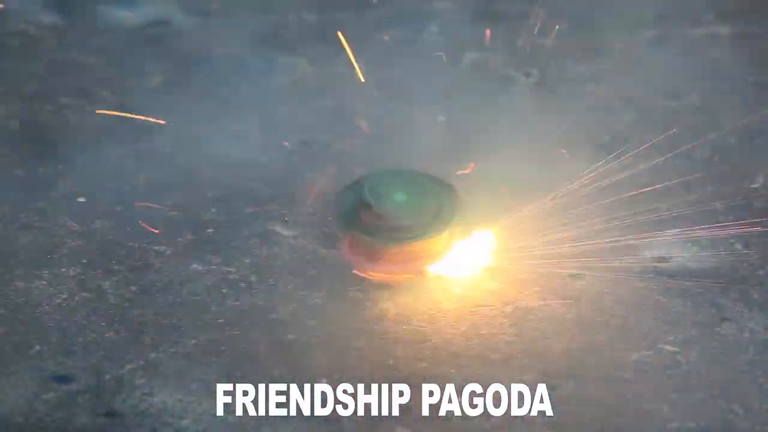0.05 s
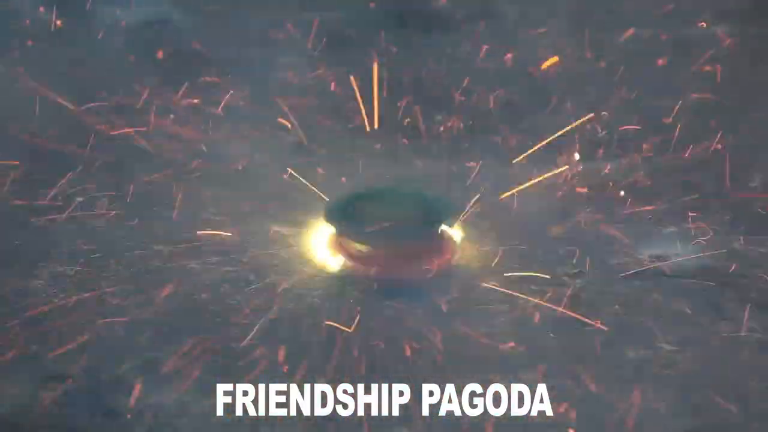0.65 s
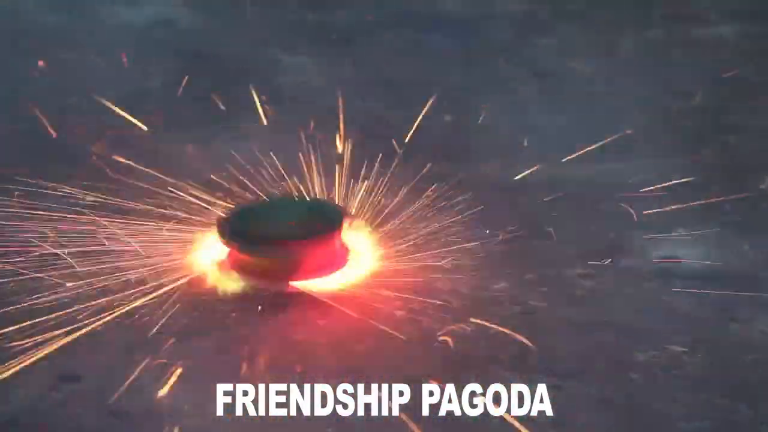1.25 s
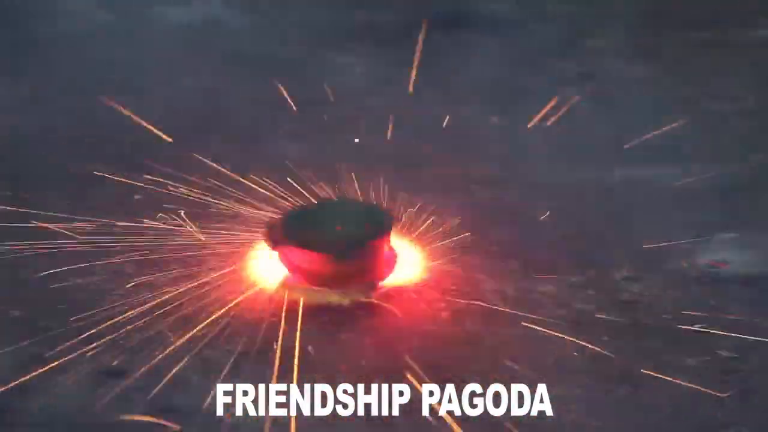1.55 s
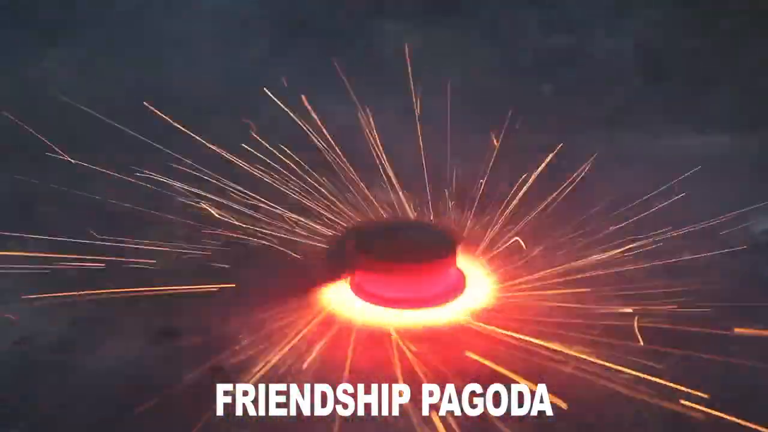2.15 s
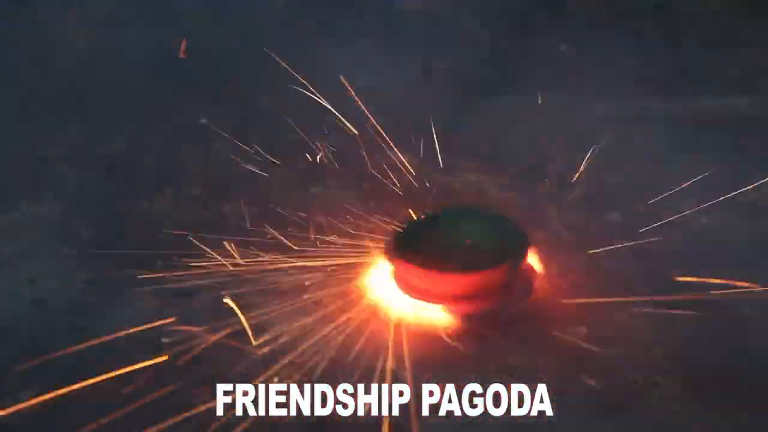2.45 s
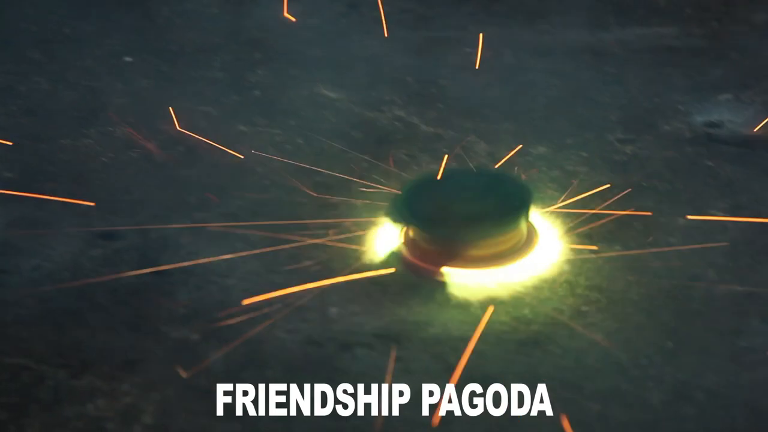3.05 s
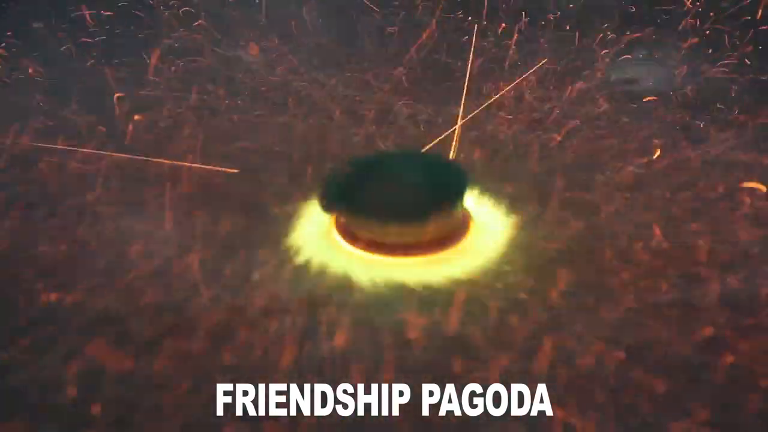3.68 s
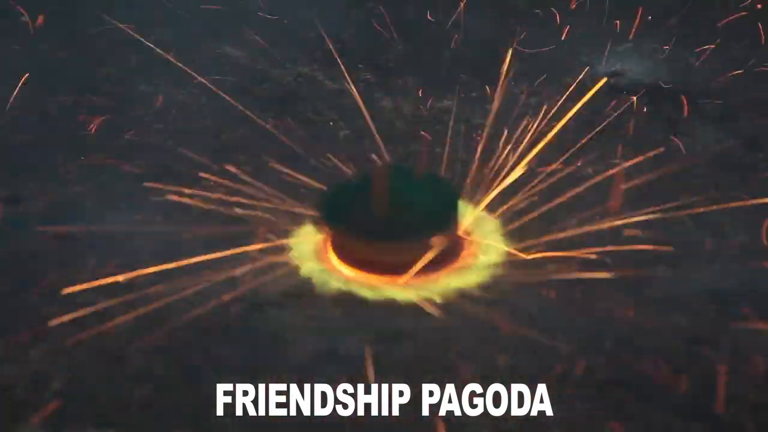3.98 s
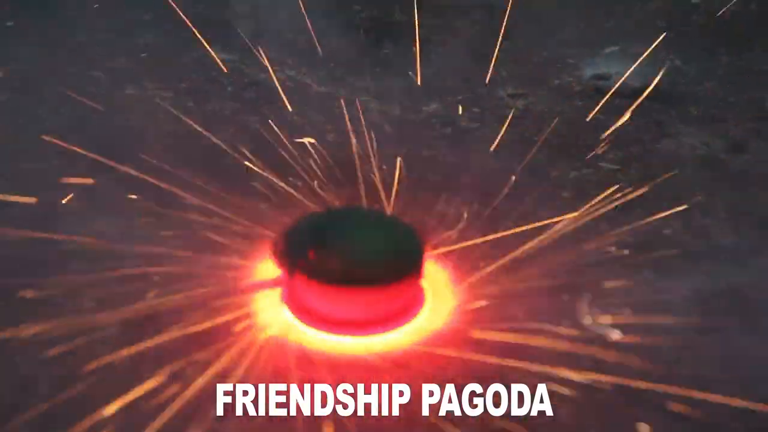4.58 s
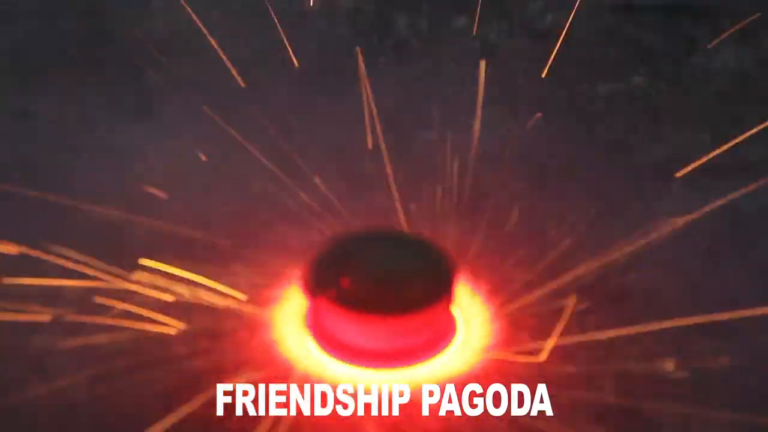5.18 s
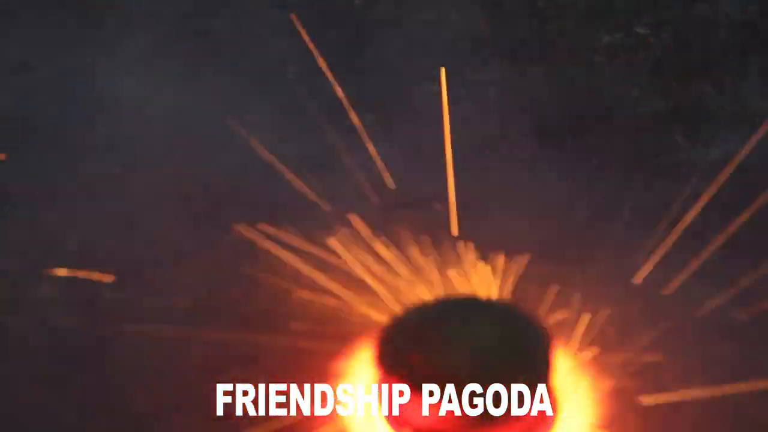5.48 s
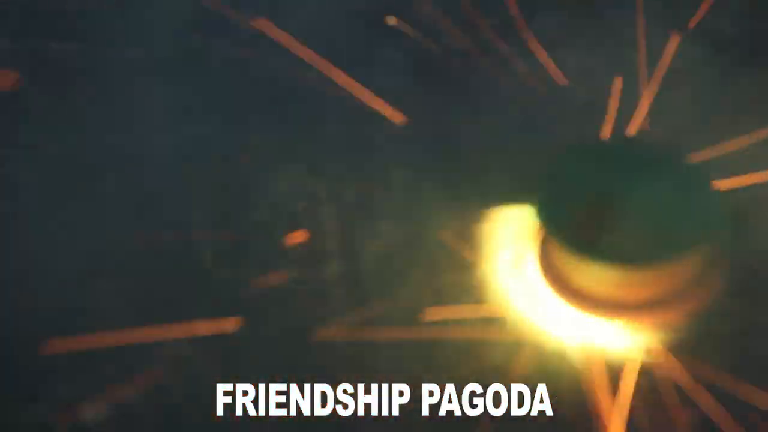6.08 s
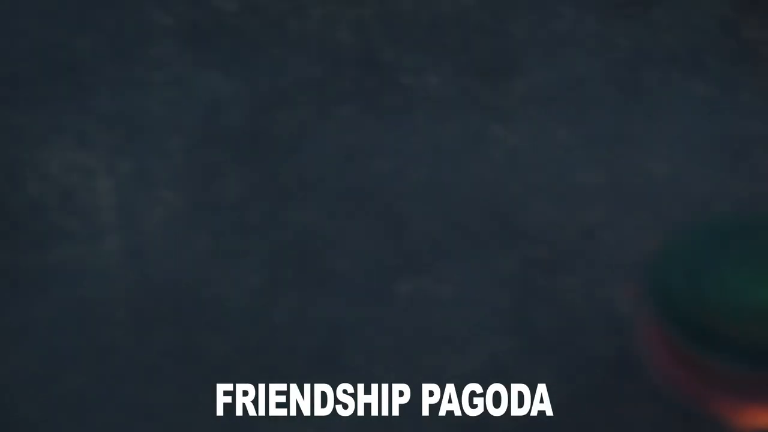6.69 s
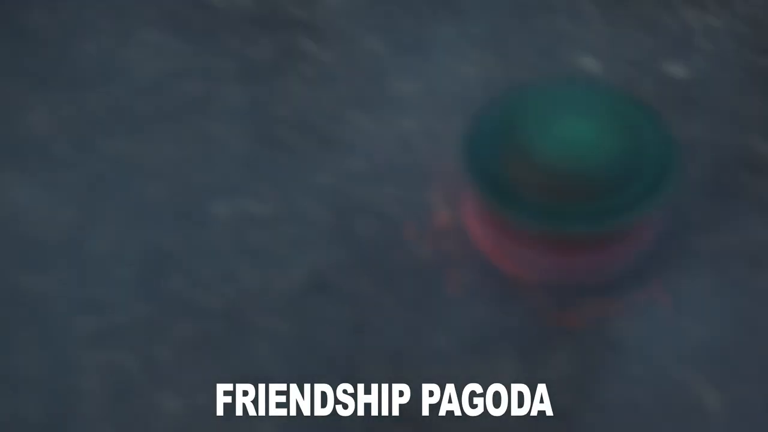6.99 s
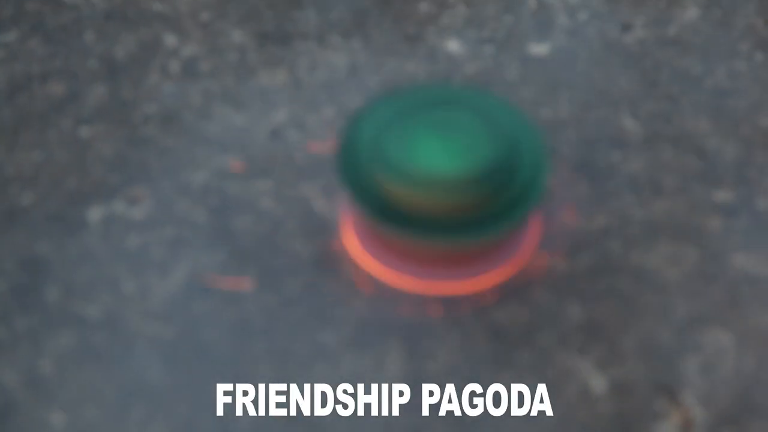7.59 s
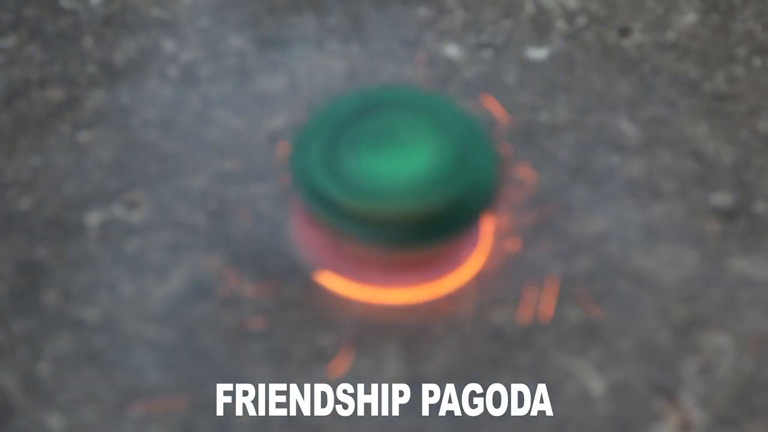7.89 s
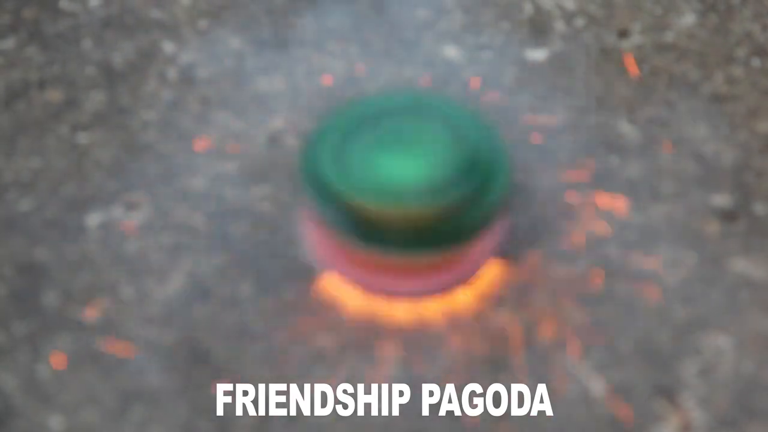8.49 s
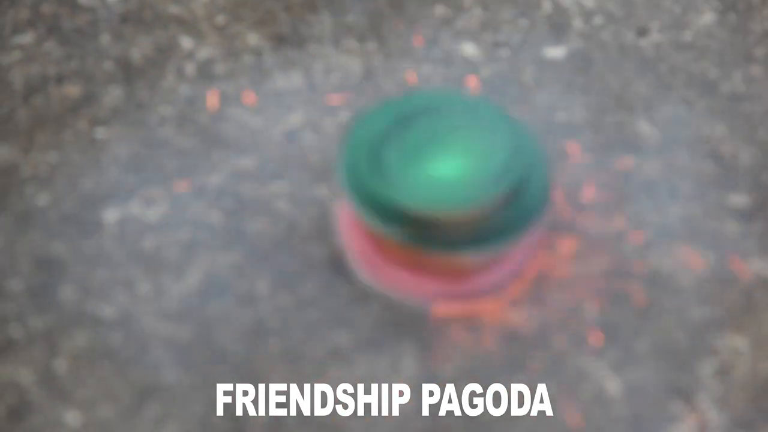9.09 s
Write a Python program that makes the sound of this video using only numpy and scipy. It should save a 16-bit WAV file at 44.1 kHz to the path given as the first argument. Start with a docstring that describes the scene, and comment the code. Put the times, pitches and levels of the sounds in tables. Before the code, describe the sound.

Outdoors and close up, a firework sputters into a loud, whirring hiss as it spins on the pavement, throwing off sharp snaps of sparks. It flares a second time, dips and builds again, then dies about two thirds of the way through. What remains is much quieter: a smouldering hiss, light ticks of the wobbling casing, soft low bumps, and finally a rising fizz of embers with a low rumble.

```python
"""A small ground firework spins up on pavement, close by, over a faint outdoor background.
Its jet of gas and burning grains hisses, sparks snap, and the nozzle's beam sweeps past once a turn.
At 3.55 s a second charge flares and burns on; near 6.3 s the flame gutters and dies.
The casing coasts, smouldering and ticking on the ground, with a few soft low bumps.
Near the end the embers catch again and fizz, and a low rumble swells."""
import sys
import numpy as np
from scipy import signal
from scipy.fft import rfft, irfft, next_fast_len
from scipy.io import wavfile

SR = 44100
rng = np.random.default_rng(int(sys.argv[2]) if len(sys.argv) > 2 else 0)


def int16_out(signal):
    """Quantize to a 16-bit WAV file."""
    q = np.round(np.clip(np.atleast_2d(signal).T, -1, 1) * 32767)
    wavfile.write(sys.argv[1], SR, q.astype(np.int16))


N = 411894
TIME = np.arange(N) / SR
FREQ_HZ = np.arange(N // 2 + 1) * SR / N + 1e-3
TOP_HZ = 15750
SECOND_LIT_S, BURNOUT_S = 3.55, 6.285


def undb(db):
    """Decibels to gain."""
    return 10 ** (np.asarray(db) / 20)


def unit(x):
    """Scale to rms 1."""
    return x / np.sqrt(np.mean(x ** 2))


def over_pitch(hz, points_hz, values):
    """Interpolate on a log-frequency axis."""
    return np.interp(np.log(hz), np.log(points_hz), values)


def band(x, hz, ratio, order=2):
    """Band-pass from hz / ratio to hz * ratio."""
    edges_hz = [hz / ratio, min(hz * ratio, SR * .45)]
    return signal.sosfilt(signal.butter(order, edges_hz, 'bandpass', fs=SR, output='sos'), x)


def walk(rate_hz, t):
    """Smooth random curve, spread near 1."""
    knots_s = np.arange(0, t[-1] + 2 / rate_hz, 1 / rate_hz)
    return np.interp(t, knots_s, rng.standard_normal(len(knots_s))) * np.sqrt(3 / 2)


def ramp(t, start_s, length_s):
    """Linear rise from 0 to 1."""
    return np.clip((t - start_s) / length_s, 0, 1)


def gate(t, start_s, length_s, edge_s):
    """Attack, hold, release."""
    return ramp(t, start_s - edge_s / 2, edge_s) - ramp(t, start_s + length_s - edge_s / 2, edge_s)


def air(level_db=-56):
    """Soft, dull outdoor background."""
    # noise spectrum (frequency [Hz], relative density [dB])
    spectrum = [(25, -34), (55, -2.5), (120, -1), (300, -6), (1000, -15), (4000, -10.5), (15000, -29)]
    gain = undb(over_pitch(FREQ_HZ, *np.transpose(spectrum)))
    return undb(level_db) * unit(irfft(rfft(rng.standard_normal(N)) * gain, N))


def rumble(hz=48, waver=0.065, throb_db=2, noise_db=-8):
    """Wavering low drone with noise around it."""
    # rumble swells (start [s], length [s], level [dB])
    swells = [(6.4, 2.5, -70), (7.25, .6, -66), (8.756, .37, -45), (9.23, .15, -45)]
    pitch_hz = hz * (1 + waver * walk(20, TIME))
    tone = np.sin(2 * np.pi * np.cumsum(pitch_hz) / SR) * undb(throb_db * walk(14, TIME))
    noise = unit(band(rng.standard_normal(N), hz=60, ratio=1.5))
    envelope = sum(undb(db) * gate(TIME, s, length_s, edge_s=.06) for s, length_s, db in swells)
    return (unit(tone) + undb(noise_db) * noise) * envelope


def bumps(rise_s=0.0055):
    """Soft pushes, each on one damped low mode."""
    # low bumps (time [s], level [dB], pitch [Hz], t60 [s])
    pushes = [(7.340, -39, 110, 0.39), (7.434, -25, 101.5, 0.23), (9.213, -33, 99, .17)]
    out = np.zeros(N)
    for s, db, hz, t60_s in pushes:
        t = np.maximum(TIME - s, 0)
        envelope = (1 - np.exp(-t / rise_s)) * np.exp(-np.log(1000) * t / t60_s)
        out += undb(db) * envelope * np.sin(2 * np.pi * hz * t)
    return out


def bursts(table, ratio, tail_db, tail_s):
    """Short noise bursts, each with a faint tail scattered from the ground."""
    out, t = np.zeros(N + SR), TIME[:SR // 3]
    for s, db, length_s, hz in table:
        body = np.sqrt(t / length_s) * np.exp(-(t / length_s) ** 2)
        tail = undb(tail_db) * np.exp(-t / tail_s)
        burst = band((body + tail) * rng.standard_normal(len(t)), hz, ratio)
        start = int(s * SR)
        out[start:start + len(t)] += undb(db) * burst / np.sqrt(np.sum(burst ** 2) / (length_s * SR))
    return out[:N]


def puffs():
    """Dull puffs of the flame."""
    # puffs (time [s], level [dB], length [s], centre [Hz])
    thumps = [(1.036, -27.5, 0.0053, 450), (1.206, -27.5, 0.006, 300), (1.240, -33, .006, 350),
              (4.383, -26.5, 0.0032, 500), (4.396, -27, 0.008, 288), (6.228, -27.5, 0.0085, 230),
              (6.807, -42, 0.0053, 750), (6.961, -41.5, 0.0048, 500), (9.092, -32, .003, 450)]
    return bursts(thumps, ratio=2.3, tail_db=-21, tail_s=0.022)


def casing_ticks(direct_db=-6):
    """The wobbling casing touches the pavement and rings briefly."""
    # ground contacts (time [s], level [dB], length [s], centre [Hz])
    touches = [(6.553, -35, .003, 4000), (6.585, -17.5, 0.0011, 2020), (6.627, -35, 0.0025, 2800),
               (6.658, -33, 0.0034, 3600), (6.662, -27, 0.0036, 2480), (6.706, -38, 0.0039, 2500),
               (6.785, -40, 0.0097, 3440), (6.875, -38, 0.0028, 1790), (6.962, -46, 0.0066, 1500),
               (7.139, -39.5, .004, 1700), (7.207, -35, 0.0065, 2800), (7.310, -36, 0.0045, 2800),
               (7.562, -29, 0.0058, 3420), (7.675, -32.5, 0.0048, 2850), (8.3445, -20.5, 0.0031, 2100),
               (9.3285, -16, 0.0023, 2950)]
    # casing resonances (frequency [Hz], gain [dB])
    modes = [(1500, -1), (2550, -5), (3950, -5), (6300, -10.5)]
    contact = bursts(touches, ratio=1.78, tail_db=-23, tail_s=0.0096)
    ring = sum(undb(db) * band(contact, hz, ratio=1.154, order=1) for hz, db in modes)
    return undb(direct_db) * contact + ring


def snaps(hz=2900, ratio=2.7):
    """Each bursting spark is one pressure spike."""
    # bursting sparks (time [s], peak [dB])
    sparks = [(.090, -4), (.103, -6), (.3545, 3), (.498, -13), (.886, -9), (1.223, -5), (1.302, -12),
              (1.448, -12), (1.529, -6.5), (1.697, -10), (1.872, -7), (2.124, -9), (2.350, -9), (2.708, -8),
              (2.776, -10), (3.268, -12), (3.375, -10), (3.601, -9), (4.707, -11), (5.131, -10),
              (5.585, -11)]
    spikes = np.zeros(N)
    for s, db in sparks:
        spikes[int(s * SR)] += undb(db)
    peak = abs(band(signal.unit_impulse(SR // 10), hz, ratio)).max()
    return band(spikes, hz, ratio) / peak


def stages(t):
    """Shares of the three stages: first charge, second charge, embers."""
    lit, spent = ramp(t, SECOND_LIT_S, length_s=0.13), ramp(t, BURNOUT_S, length_s=0.2)
    return np.array([1 - lit, lit - spent, spent])


def strength_db(t):
    """Steady jet level: a charge starts weak, then burns through."""
    # jet strength in each stage (time [s], level [dB])
    first = [(.57, -33), (.82, -31), (1.06, -22), (1.35, -23.5), (1.55, -22), (2.2, -23), (2.7, -26),
             (3.3, -25), (3.53, -25)]
    second = [(3.74, -30), (4.17, -32.5), (4.35, -27), (4.53, -24), (4.95, -25), (5.45, -24.5), (5.8, -24),
              (6.05, -22), (6.28, -23)]
    embers = [(6.55, -48), (6.95, -49.5), (7.3, -48), (7.55, -44), (7.78, -45), (8.2, -36), (8.6, -37),
              (9.3, -38.5)]
    levels_db = [np.interp(t, *np.transpose(table)) for table in (first, second, embers)]
    return np.sum(stages(t) * levels_db, axis=0)


def burn(t, full_db=-22.5, roar_lag_s=.12):
    """Low roar [dB], sizzle [dB], beam focus. A weak charge roars lower and beams less tightly."""
    # extra roar and extra sizzle (first charge [dB], second charge [dB], embers [dB])
    stage_roar_db = [-.5, -2.5, 2.5]
    stage_sizzle_db = [.5, 1.27, 4.5]
    shares = stages(t)
    burning = 1 - shares[2]
    # the second charge chokes and gutters; the embers catch with a dull rush, then fizz
    choke = burning * ramp(t, 5.9, BURNOUT_S - 5.9) ** 2
    gutter = gate(t, start_s=6.245, length_s=.22, edge_s=.05)
    catch = ramp(t, start_s=7.8, length_s=0.39)
    fizz = ramp(t, start_s=8.3, length_s=0.71)
    shortfall_db = burning * (full_db - strength_db(t - roar_lag_s))
    roar_db = np.dot(stage_roar_db, shares) + 5 * choke + 0.96 * shortfall_db
    sizzle_db = np.dot(stage_sizzle_db, shares) - 3.5 * choke - 6.5 * gutter - 4 * catch + 9 * fizz
    focus = 1.15 - .06 * burning * np.maximum(full_db - strength_db(t), 0)
    return roar_db, sizzle_db, focus * (1 - .6 * gutter)


def crackle(per_s=2200, spread_db=4.2, limit_db=19):
    """Tiny bursts of burning grains: many weak, a few strong."""
    size = undb(np.minimum(spread_db * rng.exponential(size=N), limit_db))
    return unit((rng.random(N) < per_s / SR) * size * rng.choice([-1, 1], N))


def bore(x, lower_hz=4100, upper_hz=6400, fresh_db=3.5, fade_db_per_s=2.5):
    """Two nozzle resonances: the lower grows with sizzle, the upper fades as the second charge burns."""
    # lower resonance boost (first charge [dB], second charge [dB], embers [dB])
    stage_db = [0.4, -0.7, 0.5]
    # near-whistles (start [s], length [s], boost [dB])
    swells = [(.17, .06, 4.5), (4.4, 0.38, 2), (8.75, .55, 1)]
    _, sizzle_db, _ = burn(TIME)
    shares = stages(TIME)
    swells_db = sum(db * gate(TIME, s, length_s, edge_s=0.046) for s, length_s, db in swells)
    lower_db = np.dot(stage_db, shares) + 0.62 * sizzle_db + swells_db
    upper_db = shares[1] * (fresh_db - fade_db_per_s * (TIME - SECOND_LIT_S))
    lower = (undb(lower_db) - 1) * band(x, lower_hz, ratio=1.11, order=1)
    upper = (undb(upper_db) - 1) * band(x, upper_hz, ratio=1.12, order=1)
    return x + lower + upper


def beam_sweep_db(hz, facing, beam):
    """Level swing at hz as the nozzle turns: a main lobe and a weak one behind."""
    beam_hz, once_db, direction_turns, twice_db = np.transpose(beam)
    lobe_db = over_pitch(hz, beam_hz, once_db * np.exp(-2j * np.pi * direction_turns))
    return (lobe_db * facing + over_pitch(hz, beam_hz, twice_db) * facing ** 2).real


def jet(treble_grit=0.67, sputter_db=0.8, flicker_db=0.86, spray_db=1.5, gain_db=2, step=32):
    """Turbulent gas and crackling grains; each band leaves the spinning nozzle in its own lobe."""
    # casing spin, driven by each charge, then coasting (time [s], rate [turns/s])
    spin = [(0, 2.62), (.28, 5.16), (.8, 21.54), (1.18, 22.47), (2.28, 24.8), (2.58, 24.76), (3.04, 26.19),
            (3.48, 26.18), (3.8, 36.67), (4.52, 33.35), (6.3, 28.02), (6.52, 24.83), (8.06, 14.53),
            (9.34, 6.8)]
    # relative jet spectrum (frequency [Hz], first charge [dB], second charge [dB], embers [dB])
    spectra = [(40.0, -46, -38, -26), (104, -27, -28, -13.5), (193, -17.5, -17.5, -9),
               (415, -11.5, -11.5, -3.5), (813, -6.5, -5.5, 0), (1440, -0.5, -1.5, 0.4),
               (2250, 3.5, 2.5, 3), (3040, 1.75, 0.5, -1), (4300, 3, 0, -3), (6590, -4, -8, -8.5),
               (8300, -11.5, -14, -20), (11200, -14.5, -17, -22.5), (13500.0, -14.5, -14, -18),
               (15500.0, -17, -17, -25)]
    # nozzle beam at focus 1, one table per stage
    # (frequency [Hz], once-a-turn swing [dB], direction from listener [turns], twice-a-turn swing [dB])
    beams = [
        [(300, 1.2, -.13, .4), (1700, 2.4, -.13, .4), (3800, 1.3, -.17, .6), (6500, 1.8, .15, 1.4),
         (8200, 1.6, .26, 1.1), (9800, 3.4, .41, .9), (11800, .5, .47, 1), (13500, 3, -.06, 1.5),
         (15500, 4, -.03, 1.8)],
        [(300, 1, -.08, .3), (1500, 1.3, -.14, .5), (3600, 1, .04, 1.1), (4800, 3.2, .03, 1.1),
         (6500, 4, .11, 1.1), (8400, 2.4, .28, .8), (9800, .4, .15, 2.3), (12000, 4.6, -.07, 1.9),
         (13800, 4.3, 0, 2.6), (15500, 4.1, 0, 2)],
        [(300, .4, 0, -.3), (3000, .5, -.1, -.4), (5000, 1.3, .13, .5), (6500, 3.8, -.04, -.7),
         (8600, 2.4, -.06, -.7), (10000, 3.3, 0, -.5), (11700, 4.9, -.1, -1), (14000, 2.6, -.06, -.7),
         (15500, 3.2, 0, -1)],
    ]
    # powder flares (start [s], length [s], level [dB], extra roar [dB], extra sizzle [dB])
    flares = [(0, .48, -24.5, 5, -4), (0.077, .075, -29.5, -8, 11), (0.183, .04, -24.5, -7, 3),
              (0.307, 0.057, -24, -5, 7.5), (.338, 0.029, -29, -3, 19), (0.376, 0.017, -27, -8.5, 18),
              (.43, 0.04, -20, -2, 0), (.465, 0.027, -29, 0, 12), (0.507, 0.031, -27.5, -13, 3),
              (1.178, 0.1, -24.5, 8, -9), (3.575, 0.052, -21, 4, 4.5), (3.621, 0.03, -23, 6, 9),
              (3.659, 0.023, -19.5, 4, 1), (3.68, 0.046, -29, 2, 6), (6.223, 0.093, -26, 3, -13),
              (6.301, 0.182, -39, 18, -16), (6.477, 0.13, -51.5, 12.5, 12)]
    # crackle-to-gas amplitude (first charge [ratio], second charge [ratio], embers [ratio])
    stage_grit = [.65, .31, .46]

    t = TIME[::step]
    turns = np.cumsum(np.interp(t, *np.transpose(spin))) * step / SR + .5  # starts facing away
    facing = np.exp(2j * np.pi * turns)
    shares, level_db = stages(t), strength_db(t)
    roar_db, sizzle_db, focus = burn(t)
    flaring = np.array([gate(t, s, length_s, edge_s=.02) for s, length_s, *_ in flares])
    _, _, flare_db, flare_roar_db, flare_sizzle_db = np.transpose(flares)
    uneven_db = gain_db + sputter_db * walk(110, t)  # powder burns unevenly
    bunches_db = spray_db * walk(150, t)  # sparks leave in bunches

    colour_hz, *colours_db = np.transpose(spectra)
    grid_hz = FREQ_HZ[FREQ_HZ < TOP_HZ][::step]
    for colour_db in colours_db:  # equal power in every stage's spectrum
        power = np.mean(undb(over_pitch(grid_hz, colour_hz, colour_db)) ** 2) * 2 * TOP_HZ / SR
        colour_db -= 10 * np.log10(power)

    size = next_fast_len(N, real=True)
    bins_hz = np.arange(size // 2 + 1) * SR / size
    smoothing = 1 - .35 * flaring.max(axis=0)  # a flare is mostly gas
    grit = np.interp(TIME, t, np.dot(stage_grit, shares) * smoothing)
    gas = rfft(rng.standard_normal(N) / np.hypot(1, grit), size)
    grains = rfft(crackle() * grit / np.hypot(1, grit), size)

    centres_hz = np.r_[np.geomspace(40, 2900, 14), np.linspace(3800, 15500, 14)]
    out = np.zeros(N)
    for hz, pick in zip(centres_hz, np.eye(len(centres_hz))):
        low, high = over_pitch(hz, [500, 1900], [1, 0]), over_pitch(hz, [4800, 10000], [0, 1])
        steady = undb(level_db + low * roar_db + high * sizzle_db)
        flare_gains = undb(flare_db + low * flare_roar_db + high * flare_sizzle_db)
        flow = np.sqrt(steady ** 2 + flare_gains ** 2 @ flaring ** 2)
        band_db = uneven_db + high * bunches_db + flicker_db * walk(25, t)
        for share, colour_db, beam in zip(shares, colours_db, beams):
            sweep_db = focus * beam_sweep_db(hz, facing, beam)
            band_db += share * (over_pitch(hz, colour_hz, colour_db) + sweep_db)
        source = gas + (1 + high * (treble_grit - 1)) * grains
        triangle = np.interp(bins_hz, centres_hz, pick)
        out += irfft(triangle * source, size)[:N] * np.interp(TIME, t, flow * undb(band_db))
    return out


def scene():
    """Firework and surroundings, mono."""
    firework = casing_ticks() + puffs() + bore(jet()) + snaps()
    return (firework + bumps() + rumble() + air())[None]


def record(dry, notch_hz=5450, notch_width_hz=750, notch_depth=0.67):
    """Treble notch from the microphone port, clipping, steep low-pass."""
    b, a = signal.iirpeak(notch_hz, notch_hz / notch_width_hz, fs=SR)
    notched = dry - notch_depth * signal.lfilter(b, a, dry)
    lowpass = signal.ellip(12, .1, 80, TOP_HZ, fs=SR, output='sos')
    return signal.sosfilt(lowpass, np.clip(notched, -1, 1))


dry = scene()
out = record(dry)
int16_out(out)
```